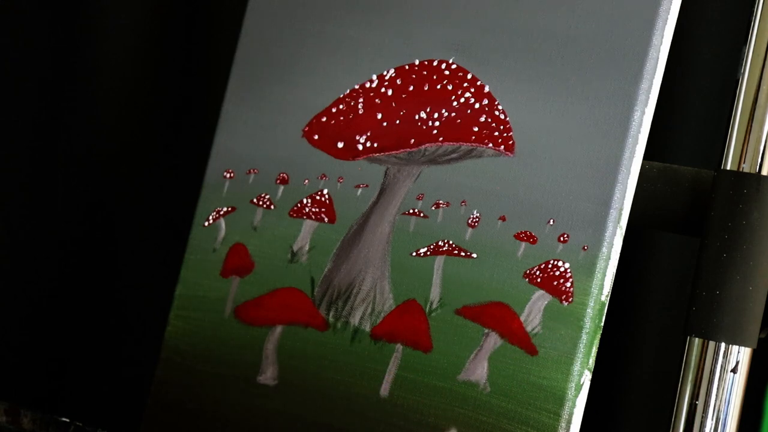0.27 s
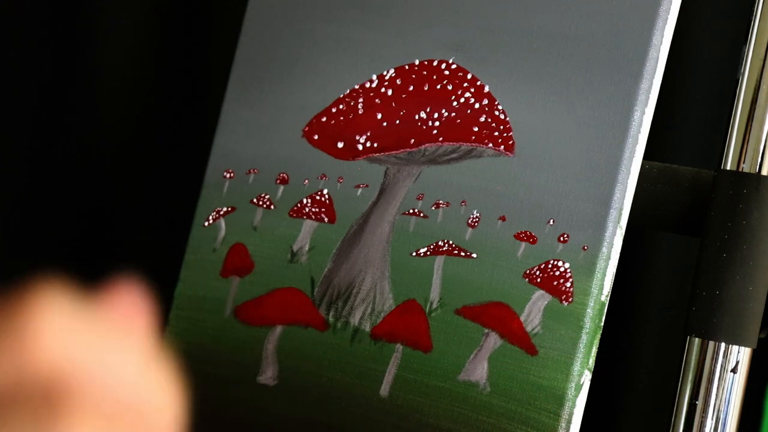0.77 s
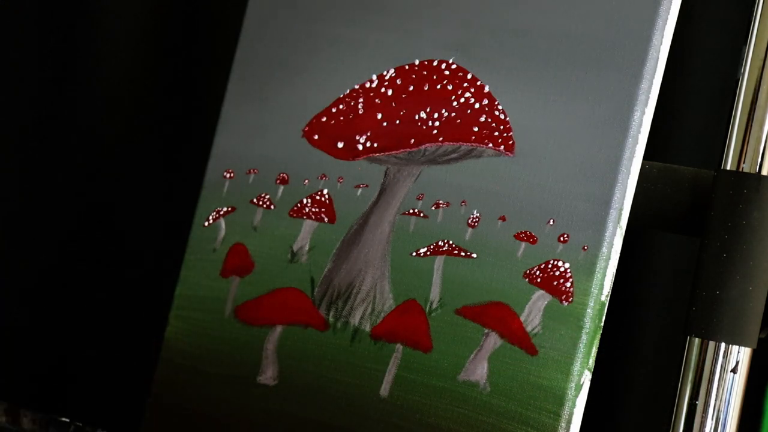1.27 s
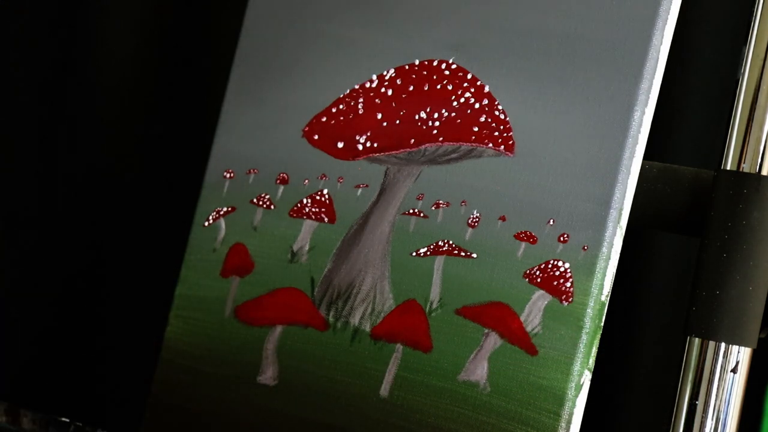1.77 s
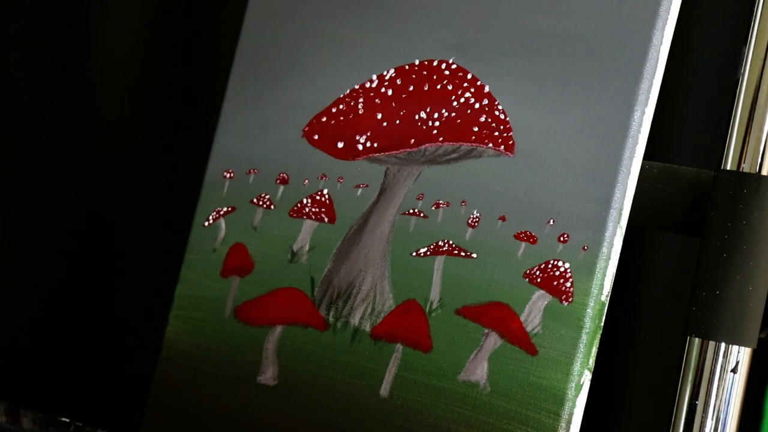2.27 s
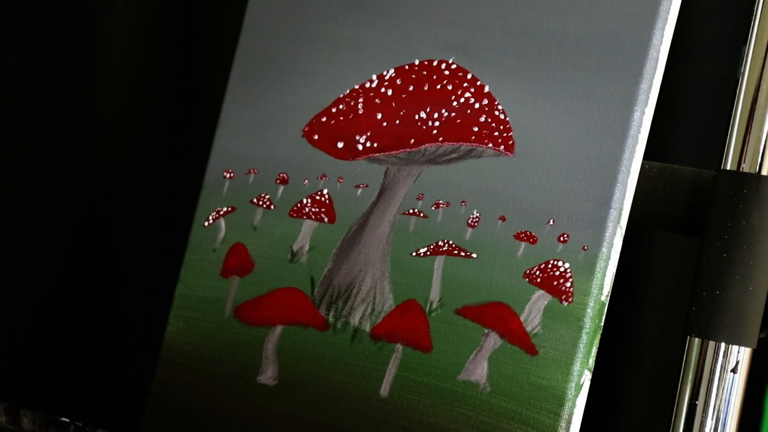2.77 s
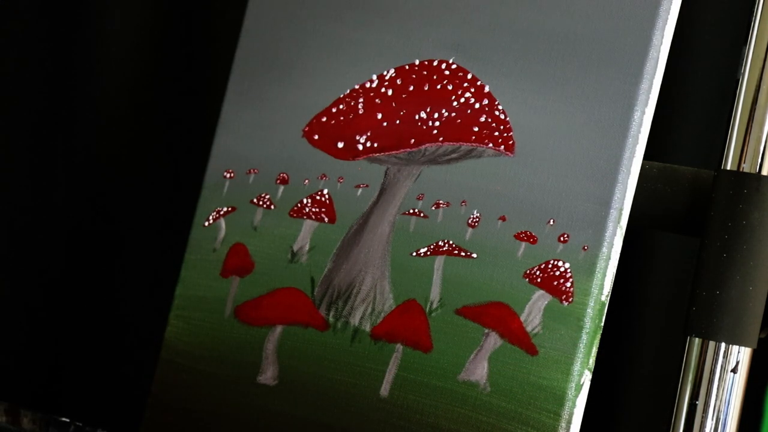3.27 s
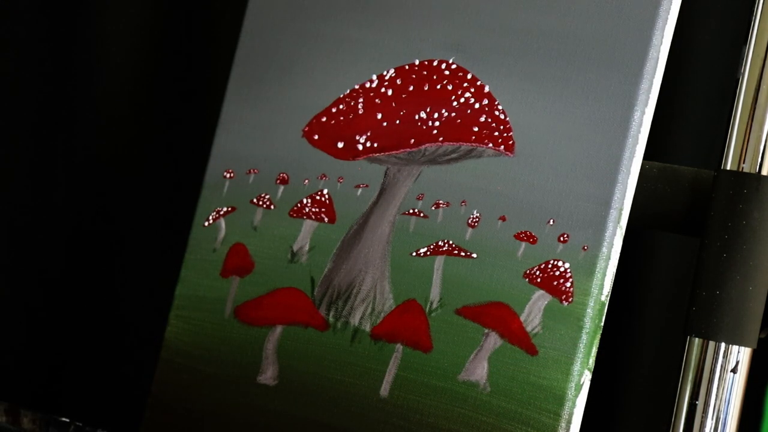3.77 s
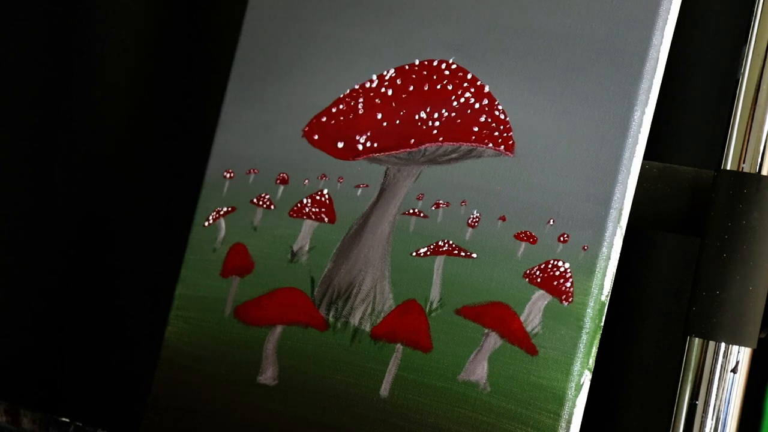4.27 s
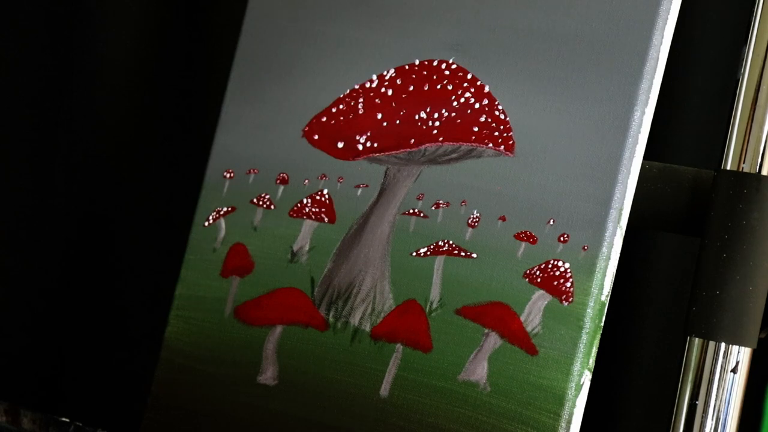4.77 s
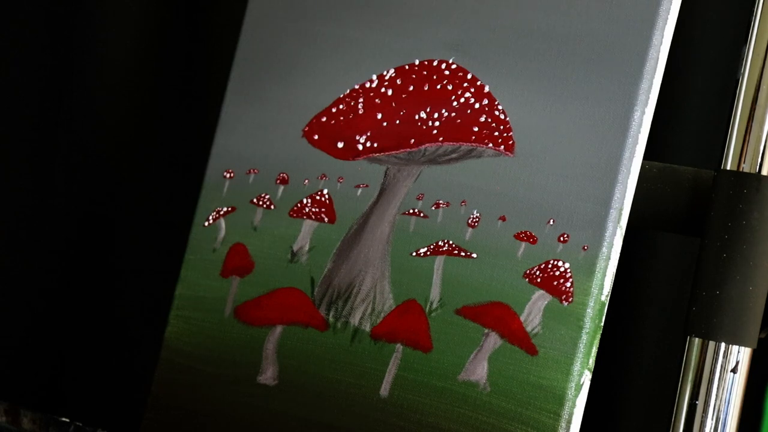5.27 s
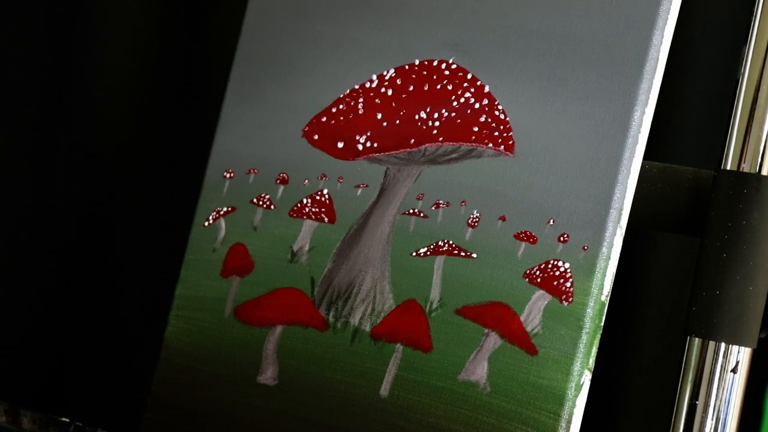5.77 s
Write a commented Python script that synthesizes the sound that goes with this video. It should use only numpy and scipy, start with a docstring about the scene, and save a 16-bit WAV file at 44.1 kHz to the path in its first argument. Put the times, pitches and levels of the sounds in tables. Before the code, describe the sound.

Low room hush first, then a brush being rinsed in a cup slightly right of centre. Crisp ticks and short bright rings come in uneven clusters, mixed with tiny drops, bubbles and dull bumps of the cup on the table. Water swishes briefly in the middle and once later. Low trembling swells as the table is jogged; final taps sound more damped. Close stereo pickup in a small room.

```python
"""A small quiet room: a two-port microphone, with a cup of water a little to its right, nearer the right port.
First only the room's hush, a distant appliance's fuzzy hum, a deep rumble and a low tremble, all shaped noise or tone.
From 1.5 s a paintbrush knocks the cup: filtered cracks and ringing modes, among short pitched rings of drops,
bubbles and the cup's own notes, as dying sines. Rumble and tremble swell as it is worked, the cup bumps the table,
and the water sloshes near 2.7 s, 2.9 s and 4.7 s. Late on the wall rings less freely; the background ends at 6 s."""
import sys
import numpy as np
from scipy import signal
from scipy.fft import rfft, irfft
from scipy.io import wavfile
from scipy.ndimage import uniform_filter1d

SR = 44100
rng = np.random.default_rng(int(sys.argv[2]) if len(sys.argv) > 2 else 0)


def gain_from_db(level_db):
    """Turn a decibel level (scalar or array-like) into a linear amplitude factor."""
    decades = np.asarray(level_db, float) / 20
    return 10 ** decades


def wav_out(sig):
    """Save sig, one row per channel (or a flat mono array), as 16-bit PCM at SR to the path in sys.argv[1]."""
    wavfile.write(sys.argv[1], SR, np.round(np.clip(np.atleast_2d(sig).T, -1, 1) * 32767).astype(np.int16))


N = 264952  # samples, about 6 s

# density of the room's broad quiet, before its overall level: pitch_hz, level_db per Hz
HUSH_SPECTRUM = [(30, -22.5), (45, -5), (64, -6.5), (87, -16.5), (124, -13.5), (150, -19.5), (209, -27.5),
                 (300, -30), (630, -38), (1200, -38.5), (2000, -51.5), (4000, -52.5), (12000, -63),
                 (14000, -94.5)]
# likeness of the hush at the two ports: pitch_hz, likeness (0 unlike, 1 the same)
HUSH_LIKENESS = [(60, 0.19), (240, 0), (950, 0.019), (3770, 0.94), (15000, 1)]
# density of the microphone's own hiss, before its overall level: pitch_hz, level_db per Hz
HISS_SPECTRUM = [(880, -30), (1500, 0), (2500, -5), (3500, -9), (5500, -12), (8000, -15), (11500, -19),
                 (13500, -32), (15600, -45)]
# fuzzy tones of a distant appliance: pitch_hz, half_width_hz, level_db
HUM_TONES = [(54.5, 24, -69), (119, 19, -77.5), (244, 21, -83.5), (866, 4.7, -90.5)]
# very deep rumble, midway between the ports: start_s, level_db
RUMBLE_LEVEL = [(0.0, -63), (0.8, -48), (1.24, -57.5), (1.49, -51.5), (1.62, -61), (1.72, -45),
                (2.0, -47.5), (2.55, -50.5), (2.72, -34.5), (3.07, -48), (3.46, -39.5), (3.74, -48.5),
                (4.28, -50.5), (4.68, -44.5), (5.0, -50.5), (5.36, -52.5), (5.71, -49), (6.0, -50)]
# the stand's own tone, midway between the ports: start_s, level_db
SWAY_LEVEL = [(0.0, -74), (0.6, -69.5), (1.69, -63.5), (1.75, -53), (2.02, -49), (2.1, -57), (2.29, -58),
              (3.04, -48.5), (3.23, -49), (3.55, -51.5), (3.66, -52), (3.72, -80), (4.29, -48.5),
              (4.53, -62.5), (4.61, -74), (5.3, -56.5), (6.0, -57.5)]
# decay of the room's tail: pitch_hz, t60_s
ROOM_DECAY = [(300, 0.64), (1000, 0.29), (3000, 0.22), (8000, 0.21), (15000, 0.17)]
# early echoes off table and walls: least_delay_ms, level_db against the direct sound
EARLY_ECHOES = [(1.5, -3.5), (3.2, 0), (5.5, -13.5), (8.5, -13.5), (12, -22), (15, -6), (19, -10.5)]
# water stirred by the bristles, before the room: start_s, level_db
SLOSH_LEVEL = [(1.45, -94.5), (2.62, -103.5), (2.65, -59), (2.77, -82.5), (2.93, -55.5), (3.05, -93),
               (3.17, -74), (3.5, -99.5), (4.65, -116), (4.72, -80), (4.9, -102.5), (5.8, -123)]
# dull bumps of the cup on the table, before the room: start_s, level_db, pitch_hz at the start
TABLE_BUMPS = [(1.653, -59.5, 228.4), (2.087, -55, 240), (2.65, -56.5, 275), (2.861, -59, 221),
               (3.429, -61, 226), (4.684, -55.5, 228.4)]
# short pitched rings: drops, bubbles and the cup's own notes, before the room:
# start_s, level_db, pitch_hz at the start
PITCHED_RINGS = [(1.498, -73, 681.4), (1.4975, -56, 2120), (1.6344, -57.5, 2450), (1.64, -64, 590),
                 (1.6412, -55, 3207), (1.691, -57.5, 660), (1.7155, -50.5, 1159), (1.744, -57, 670),
                 (1.872, -59.5, 694), (1.897, -60.5, 678), (1.8971, -61, 2217), (2.0204, -55, 1915),
                 (2.0348, -32, 2120), (2.044, -44.5, 565), (2.0777, -41.5, 2054), (2.095, -58, 673),
                 (2.1096, -48, 5180), (2.3531, -61, 660), (2.593, -43, 1466), (2.611, -47, 2580),
                 (2.628, -40.5, 795), (2.629, -44, 689), (2.649, -47.5, 761), (2.694, -35.5, 2192),
                 (2.7217, -51, 3465), (2.7394, -55.5, 1140), (2.7442, -61.5, 7200), (2.7871, -41, 1620),
                 (2.8025, -51, 6980), (2.8095, -44.5, 2393), (2.8244, -48, 2620), (2.83, -47, 3317),
                 (2.8828, -45.5, 4240), (2.9018, -34, 4830), (2.9357, -37, 1091), (2.9362, -34.5, 2280),
                 (2.949, -51, 686), (3.0275, -50.5, 3570), (3.087, -59.5, 711), (3.1009, -51.5, 3330),
                 (3.1193, -40, 4266), (3.1248, -44.5, 7510), (3.1258, -49, 1435), (3.1453, -45, 1450),
                 (3.1976, -43.5, 1430), (3.1976, -36, 3420), (3.198, -58, 665), (3.1981, -47, 2516),
                 (3.3812, -46, 2483), (3.415, -67, 672), (3.4925, -62.5, 4340), (3.6017, -55.5, 2230),
                 (3.7554, -62, 7000), (3.7818, -60, 1450), (3.7978, -47.5, 1365), (3.815, -48.5, 1260),
                 (3.9664, -46, 2336), (4.314, -64.5, 590), (4.3334, -53.5, 3376), (4.334, -59, 2630),
                 (4.578, -62, 3320), (4.578, -67, 4690), (4.6668, -42, 2376), (4.6673, -42, 1669),
                 (4.689, -58, 538), (4.7072, -52, 2350), (4.7137, -48, 1633), (4.7194, -50.5, 3475),
                 (4.7331, -48.5, 1750), (4.7331, -49.5, 2376), (4.781, -52, 3240), (4.7994, -58, 1736),
                 (4.8524, -61, 3200), (5.014, -60, 2620), (5.0294, -64.5, 2090), (5.066, -61.5, 668),
                 (5.1093, -47, 1469), (5.116, -60, 579), (5.1173, -47, 2150), (5.1244, -57, 1380),
                 (5.1394, -52, 1370), (5.1594, -63, 1330), (5.2929, -50.5, 2260), (5.3014, -55.5, 1694),
                 (5.3951, -57, 2350), (5.3981, -55, 4814), (5.45, -47, 4540), (5.4505, -48, 3315),
                 (5.5413, -52.5, 2630), (5.568, -75, 7500), (5.6007, -56.5, 2500), (5.604, -60, 607)]
# brush against the cup, before the room: start_s, blow_db, then against the blow: thud_db, body_db, edge_db
BRUSH_KNOCKS = [(1.495, -54, -9, -17.5, -8), (1.64, -73.5, -2, 2, -40), (1.7151, -43, -33, -16.5, -1),
                (1.8946, -81.5, 23, 9, -13.5), (2.0353, -37, -14, -4.5, -1),
                (2.0775, -38.5, -6, -8.5, -1.5), (2.3531, -85, 16, 10, -30),
                (2.591, -54.5, -5, -10.5, -13.5), (2.6091, -46, -8.5, -8.5, -10),
                (2.6926, -75.5, 5, 18, -19), (2.7242, -64.5, -10, 3.5, -11.5),
                (2.9336, -34.5, -11.5, -19.5, -3.5), (3.1193, -70, -11, 7, -21),
                (3.1408, -40.5, -32, -14.5, -8.5), (3.198, -56.5, -14, 7, -10), (3.249, -53, -26, -31, -23),
                (3.3801, -74.5, -14, 24.5, -45), (3.495, -83, -2, -15.5, -28),
                (3.5877, -82, -11, 14.5, -31), (3.756, -71, 4, -20.5, -25), (3.7965, -41.5, -23.5, -17, -2),
                (3.9657, -69, -16, -9.5, -16), (4.054, -83.5, -6, -23, -17),
                (4.1823, -46.5, -46.5, -16, -5.5), (4.3005, -54, -43, -13.5, -5.5),
                (4.6678, -39, -12.5, -13, -4.5), (4.819, -66.5, -11, 4.5, -33), (4.9412, -83, -4, -9, -6.5),
                (5.0485, -46, -17, -14.5, -11), (5.1138, -64, 6.5, 3.5, -4), (5.239, -69.5, -9, -9.5, -31),
                (5.291, -55, -25, -19, -27.5), (5.3976, -81, -15, -12.5, -19),
                (5.449, -62.5, -35, 9, -23.5), (5.5393, -79, -18, 11, -1), (5.593, -41.5, -16.5, -14, -9)]
# centres of the four colour zones of a knock, in the order thud, body, blow, edge: pitch_hz
KNOCK_ZONES = [800, 2600, 5700, 11000]
# modes of the cup, before each knock varies them: pitch_hz, level_db, t60_s
CUP_MODES = [(657, -11, 0.18), (1140, -19, 0.033), (2150, -16.5, 0.063), (2280, -4.5, 0.12),
             (2450, 1.5, 0.09), (3240, -1.5, 0.15), (3420, -5, 0.082), (3560, -19, 0.12),
             (4068, -3.5, 0.09), (4890, -12, 0.09), (4840, 2, 0.092), (5447, -28.5, 0.038),
             (6450, -5, 0.091), (6514, -18.5, 0.013), (6980, -0.5, 0.016), (7000, -11, 0.09),
             (8090, -14.5, 0.075), (8780, -6, 0.09)]
# broad colour that the cup wall gives a crack: pitch_hz, level_db
WALL_COLOUR = [(300, -19.5), (430, -8), (600, 0), (1000, 1.5), (1700, -9.5), (2200, 11), (2800, -0.5),
               (3300, 12), (3800, -3), (4800, 8), (5700, -2.5), (6800, 7.5), (12000, -1.5), (15000, -10.5),
               (17000, -44)]
# how freely the wall rings, damped late on: start_s, level_db
RING_FREEDOM = [(1.5, -5.5), (3.0, -6.5), (4.3, -4.5), (4.6, -7.5), (5.6, -15)]


def evened(x):
    """Scales to rms 1."""
    return x / np.sqrt(np.mean(x ** 2) + 1e-20)


def read(points, hz):
    """Reads a table on a log-frequency axis."""
    table_hz, value = np.transpose(points)
    return np.interp(np.log(hz + 1), np.log(table_hz + 1), value)


def add(mix, start_s, sound):
    """Adds a sound at a moment."""
    part = mix[round(start_s * SR):][:len(sound)]
    part += sound[:len(part)]


def noise(gain, likeness):
    """Steady two-port noise of rms 1; gain and likeness are functions of frequency."""
    hz = np.fft.rfftfreq(N, 1 / SR)
    a, b, c, d = rng.standard_normal((4, len(hz)))
    same = np.clip(likeness(hz), -1, 1)
    left = a + 1j * b
    right = same * left + np.sqrt(1 - same ** 2) * (c + 1j * d)
    return evened(irfft(np.array([left, right]) * gain(hz), N))


def leaned(rows, lean_db):
    """Gains for the two ports from a level curve and a steady lean to the left (left minus right)."""
    start_s, level_db = np.transpose(rows)
    level = np.interp(np.arange(N) / SR, start_s, level_db)
    return gain_from_db(level + np.array([[lean_db], [-lean_db]]) / 2)


def coloured(x, level_db):
    """Causal (minimum-phase) filter from a gain curve in dB over twice the length of x."""
    log_gain = np.log(gain_from_db(np.concatenate([level_db, level_db[-2:0:-1]])))
    response = np.exp(np.conj(signal.hilbert(log_gain)))[:len(level_db)]
    return irfft(rfft(x, 2 * len(x)) * response)[:len(x)]


def hush():
    """The broad quiet of the room, partly shared by the ports, and the microphone's own unshared hiss."""
    air = noise(lambda hz: gain_from_db(read(HUSH_SPECTRUM, hz)), lambda hz: read(HUSH_LIKENESS, hz))
    hiss = noise(lambda hz: gain_from_db(read(HISS_SPECTRUM, hz)), lambda hz: 0 * hz)
    return gain_from_db(-63) * air + gain_from_db(-80.5) * hiss


def hum(likeness=0.23):
    """Fuzzy tones of a distant appliance: noise in narrow bell-shaped bands, so that each wavers."""
    total = np.zeros((2, N))
    for pitch_hz, half_width_hz, level_db in HUM_TONES:
        tone = noise(lambda hz: 1 / (1 + ((hz - pitch_hz) / half_width_hz) ** 2),
                     lambda hz: likeness + 0 * hz)
        total += gain_from_db(level_db) * tone
    return total


def rumble(low_hz=6.5, high_hz=13.6, likeness=0.071):
    """Very deep shaking, unlike at the two ports: noise kept to a band of a few hertz."""
    shaking = noise(lambda hz: hz / (hz + low_hz) / (1 + (hz / high_hz) ** 4),
                    lambda hz: likeness + 0 * hz)
    return leaned(RUMBLE_LEVEL, -2) * shaking


def sway(pitch_hz=28.8, lag_rad=0.78):
    """The microphone stand trembles at its own low tone when the table is jogged; the right port lags."""
    angle = 2 * np.pi * pitch_hz * np.arange(N) / SR
    return leaned(SWAY_LEVEL, 17) * np.sin([angle, angle - lag_rad])


def path(left_lag=21):
    """Direct sound, left_lag samples later at the left port, a few early echoes, a dense tail dying by band."""
    taps = np.zeros((2, SR // 2))
    starts = np.arange(100, SR // 2 - 20, 10)
    at = starts + rng.integers(0, 10, (2, len(starts)))  # one tap at a chance place in every ten samples
    np.put_along_axis(taps, at, rng.choice([-1., 1.], at.shape), 1)
    hz, t, bands = signal.stft(taps, SR, nperseg=128)
    decay = gain_from_db(-60 * t / read(ROOM_DECAY, hz)[:, None])
    tail = signal.istft(bands * decay, SR, nperseg=128)[1]
    way = tail / np.linalg.norm(tail[0])  # as much energy in the left tail as in the direct sound
    way[[0, 1], [left_lag, 0]] += 1
    for delay_ms, level_db in EARLY_ECHOES:
        arrival = round(delay_ms * SR / 1000) + rng.integers(0, 30, 2)
        way[[0, 1], arrival] += gain_from_db(level_db) * rng.choice([-1, 1])
    return way


def room(turns, right_db=3.):
    """Each row of sounds gets a random room tail of its own; the right port hears them louder."""
    heard = sum(signal.fftconvolve(x[None], path(), axes=1)[:, :N] for x in turns)
    return heard * gain_from_db([[-right_db / 2], [right_db / 2]])


def slosh(per_s=600, low_hz=641.4, high_hz=8220.0, cycles=6.9, spread_db=6.0, tilt_db=2.5):
    """Stirred water: many tiny bubbles at chance moments, in 30 pitches, each a short swelling and dying sine."""
    out = np.zeros(N)
    for hz in np.geomspace(low_hz, high_hz, 30):
        turns = np.arange(2000) / SR * hz
        swell = turns * np.exp(-5 * turns / cycles)
        grain = np.sin(2 * np.pi * turns) * swell * gain_from_db(tilt_db * np.log2(hz / low_hz))  # tilt per octave
        sizes = gain_from_db(spread_db * np.minimum(rng.exponential(1, N), 3))
        bursts = sizes * (rng.random(N) < per_s / 30 / SR)
        out += signal.oaconvolve(bursts, grain)[:N]
    start_s, level_db = np.transpose(SLOSH_LEVEL)
    return evened(out) * gain_from_db(np.interp(np.arange(N) / SR, start_s, level_db, -120, -120))


def shaken_tone(level_db, hz, t60_s, wet, onset_s, rise=0.01, blur=.4):
    """A dying sine that slides up by the share rise over t60_s, partly (wet, 0-1) shaken by smoothed noise."""
    t = np.arange(6000) / SR
    pitch = hz * (1 + rise * np.minimum(t / t60_s, 1))
    span = max(round(SR / (blur * hz)), 2)
    shaking = rng.standard_normal((2, len(t)))
    for _ in range(2):
        shaking = uniform_filter1d(shaking, span, 1)
    shaking *= np.sqrt(3 * span / 4)  # makes up the power lost in smoothing
    shake = 1 - wet + wet * (shaking[0] + 1j * shaking[1])
    tone = (shake * np.exp(2j * np.pi * np.cumsum(pitch) / SR)).imag
    return gain_from_db(level_db - 60 * t / t60_s) * (1 - np.exp(-t / onset_s)) ** 2 * tone


def bump(level_db, hz):
    """The cup bumps the table: a soft-edged low tone, mostly shaken into noise."""
    return shaken_tone(level_db, hz, t60_s=0.14, wet=0.86, onset_s=0.006)


def pitched_ring(level_db, hz):
    """A drop, a bubble or a note of the cup: a dying sine, a little gurgling, higher ones dying sooner."""
    t60_s = 0.047 * (1000 / hz) ** 0.21  # 0.047 s at 1 kHz
    return shaken_tone(level_db, hz, t60_s, wet=0.31, onset_s=0.00022)


def knock(blow_db, thud_db, body_db, edge_db, ring_db):
    """A tick, a short crack and the cup's modes; where and how hard it is struck tilts the colour."""
    crack_t60_s, tick_t60_s, tick_db, swing_s = 0.08, 0.0081, 10, 0.00028
    colour = list(zip(KNOCK_ZONES, [thud_db, body_db, 0, edge_db]))
    t = np.arange(8192) / SR
    hz, level_db, t60_s = np.transpose(CUP_MODES)[:, :, None]
    chance = rng.standard_normal((2, *hz.shape))  # varies each mode's level and pitch slightly per knock
    struck_db = level_db + read(colour, hz) + 2 * chance[0]
    struck_hz = hz * (1 + .002 * chance[1])
    ring = (gain_from_db(struck_db - 60 * t / t60_s) * np.sin(2 * np.pi * struck_hz * t)).sum(0)
    ring *= (1 - np.exp(-t / swing_s)) ** 2  # the wall takes a moment to swing
    fading = gain_from_db(-60 * t / crack_t60_s) + gain_from_db(tick_db - 60 * t / tick_t60_s)
    burst = rng.standard_normal(len(t)) * fading
    bins = np.fft.rfftfreq(2 * len(t), 1 / SR)
    crack = coloured(burst, read(colour, bins) + read(WALL_COLOUR, bins))
    return gain_from_db(blow_db) * (gain_from_db(ring_db) * ring + crack)


def scene():
    """Cup sounds in the room over the steady background."""
    turns = np.zeros((4, N))  # knocks and rings take turns through four random room tails
    turns[0] = slosh()
    for start_s, level_db, hz in TABLE_BUMPS:
        add(turns[0], start_s, bump(level_db, hz))
    for k, (start_s, level_db, hz) in enumerate(PITCHED_RINGS):
        add(turns[k % len(turns)], start_s, pitched_ring(level_db, hz))
    for k, (start_s, *blow) in enumerate(BRUSH_KNOCKS):
        ring_db = np.interp(start_s, *np.transpose(RING_FREEDOM))
        add(turns[k % len(turns)], start_s, knock(*blow, ring_db))
    return hush() + hum() + rumble() + sway() + room(turns)


def roll_off(x):
    """The treble ends steeply here."""
    return signal.sosfilt(signal.butter(12, 16780, fs=SR, output="sos"), x)


def record(dry):
    """The finished mix as it is kept, left and right port."""
    return roll_off(dry)


dry = scene()
out = record(dry)
wav_out(out)
```